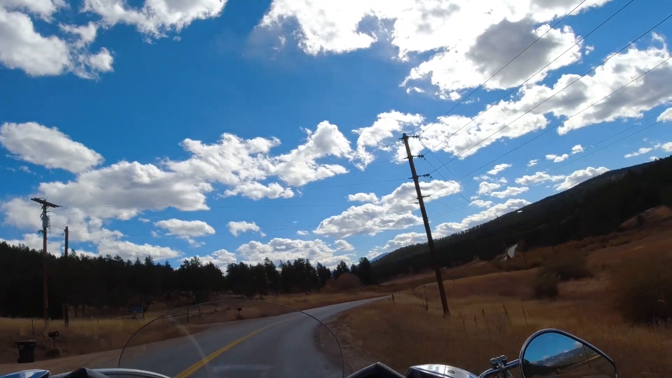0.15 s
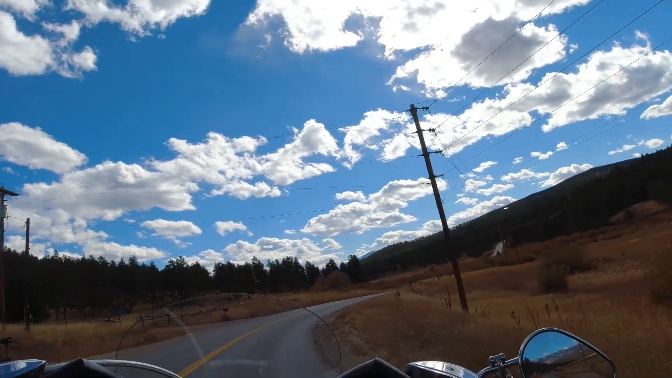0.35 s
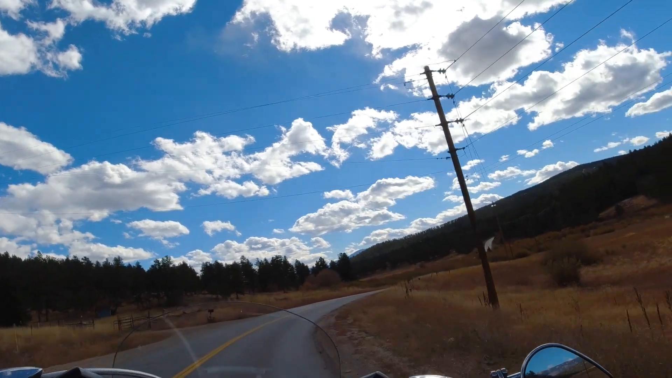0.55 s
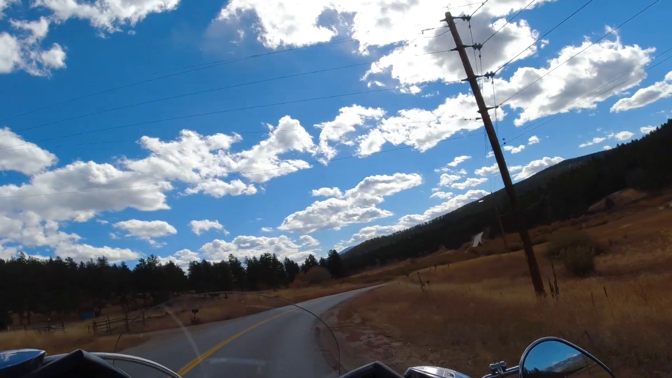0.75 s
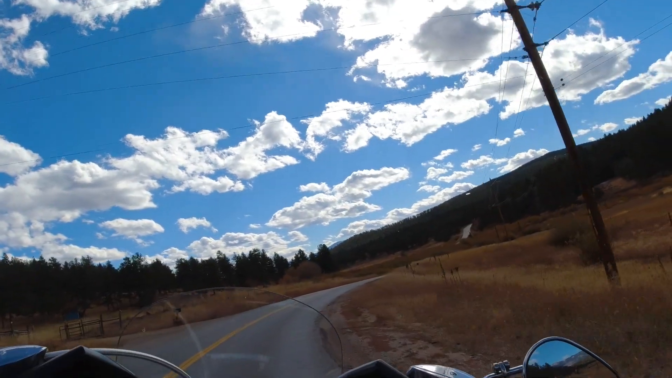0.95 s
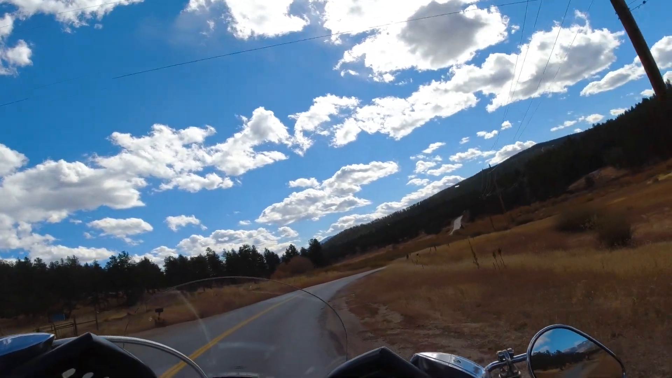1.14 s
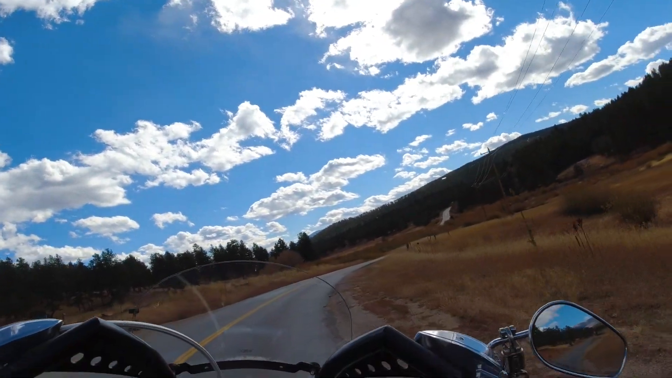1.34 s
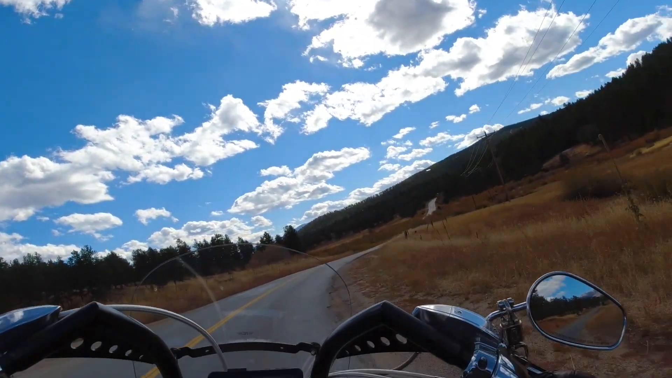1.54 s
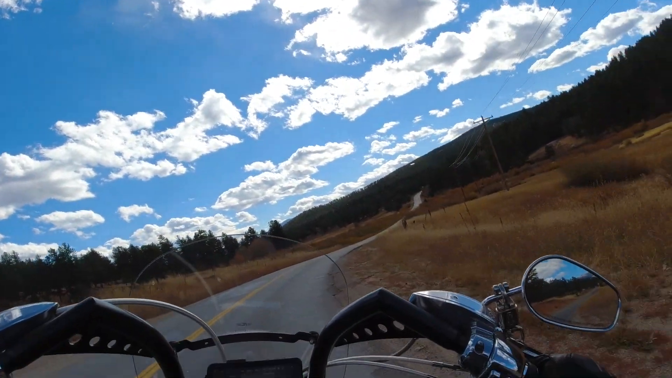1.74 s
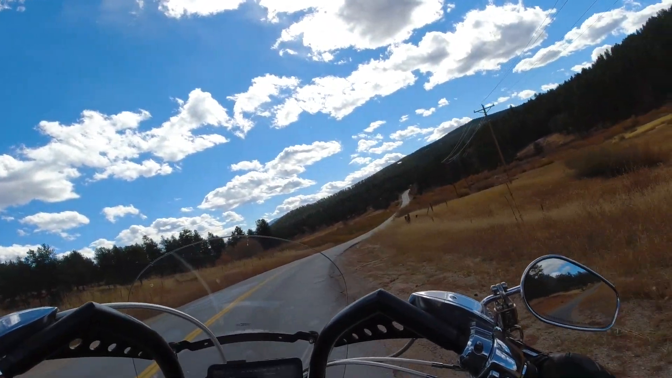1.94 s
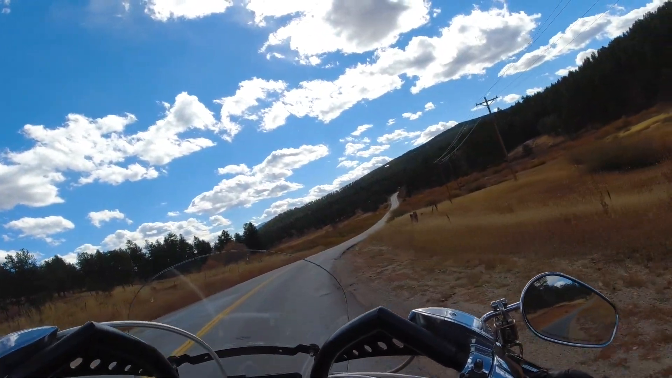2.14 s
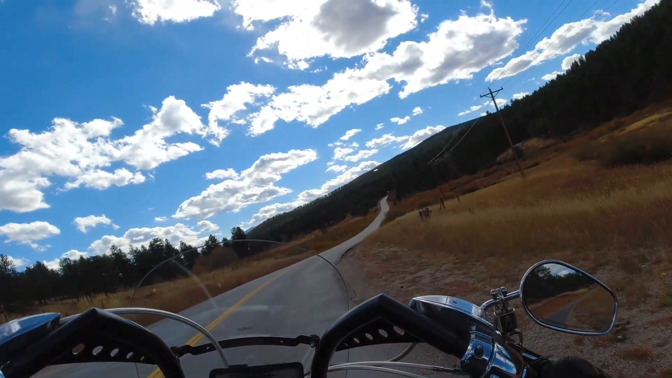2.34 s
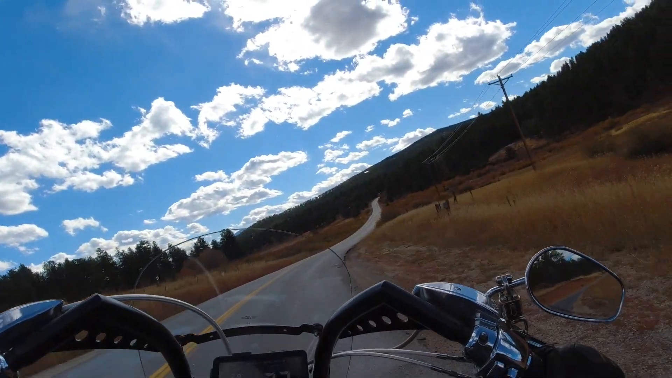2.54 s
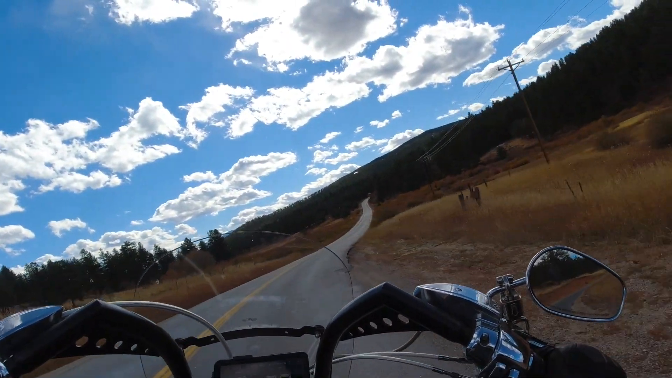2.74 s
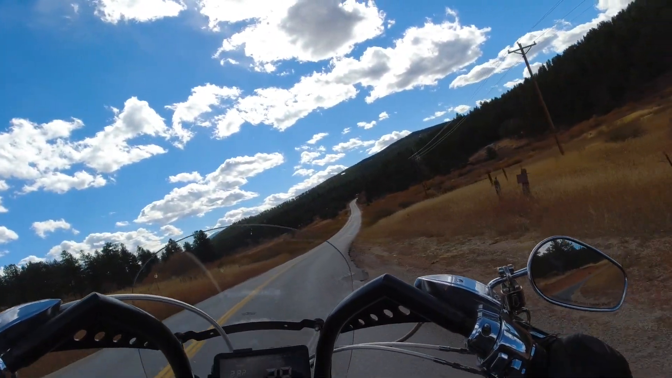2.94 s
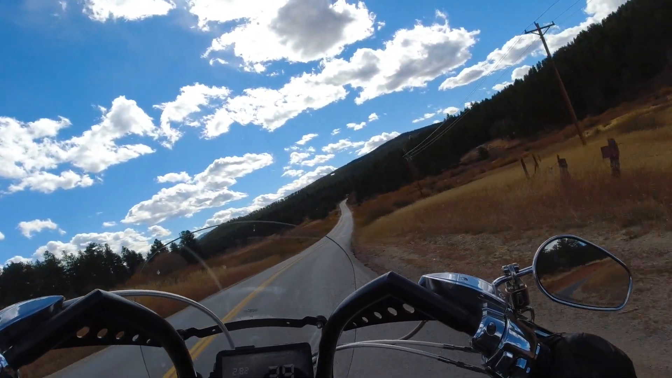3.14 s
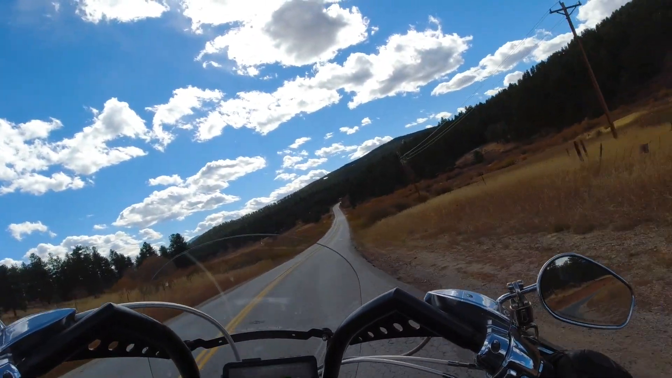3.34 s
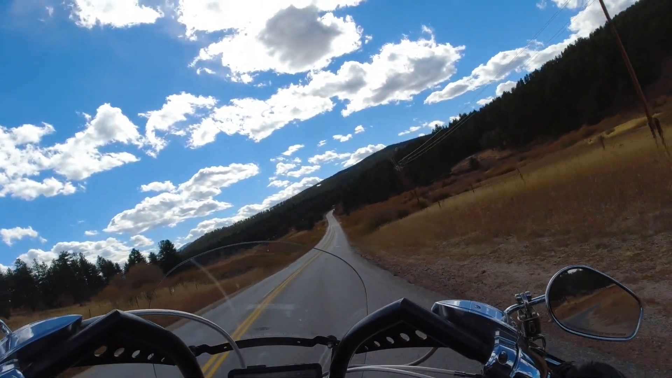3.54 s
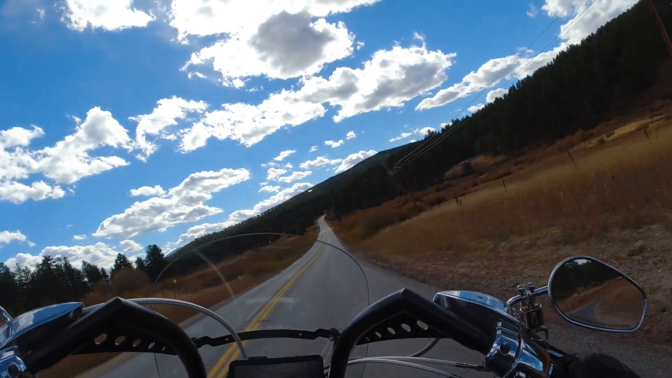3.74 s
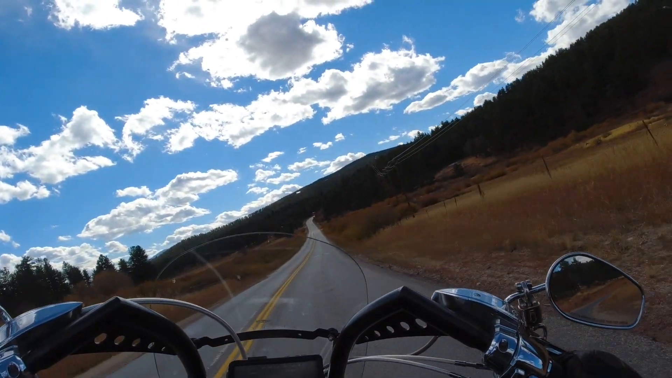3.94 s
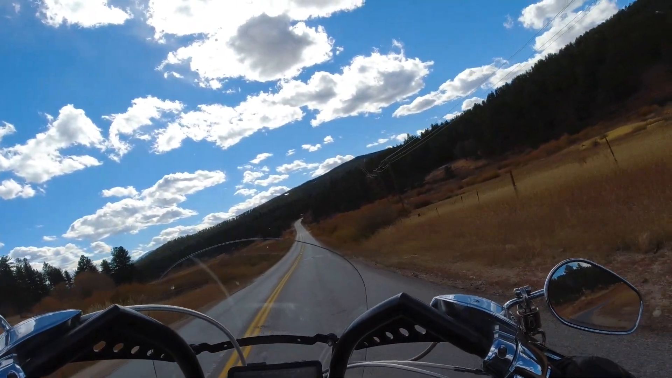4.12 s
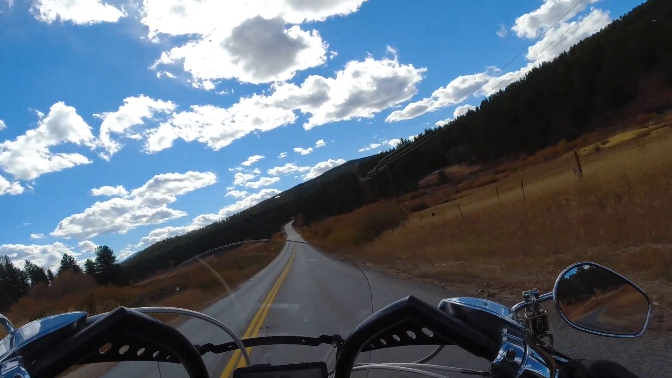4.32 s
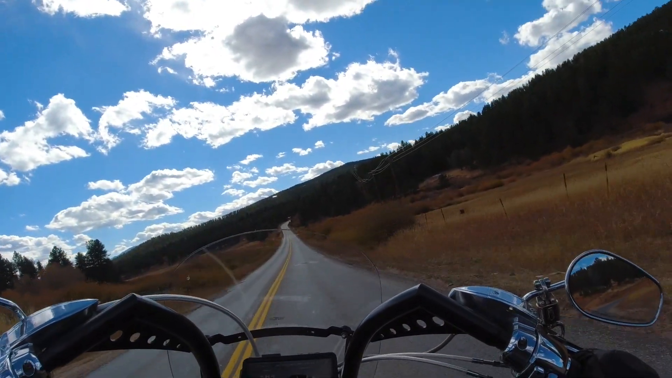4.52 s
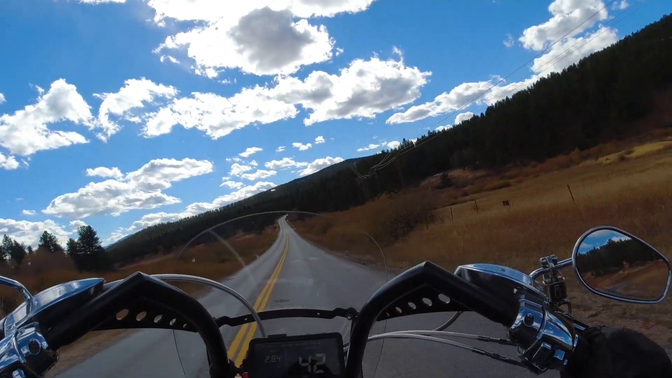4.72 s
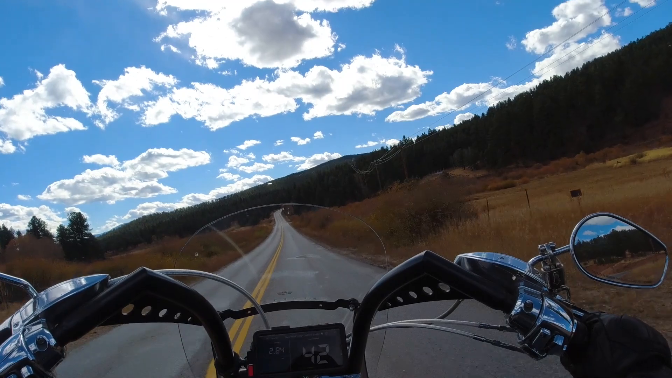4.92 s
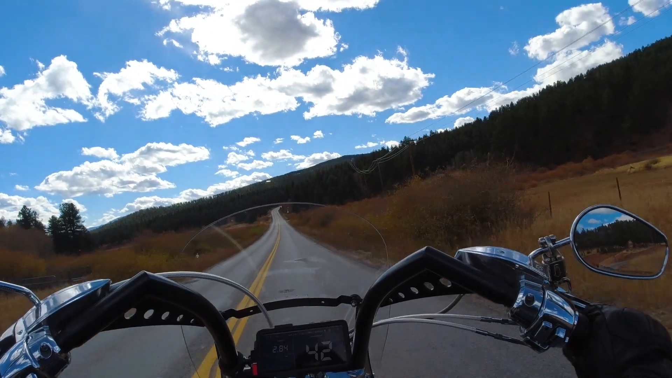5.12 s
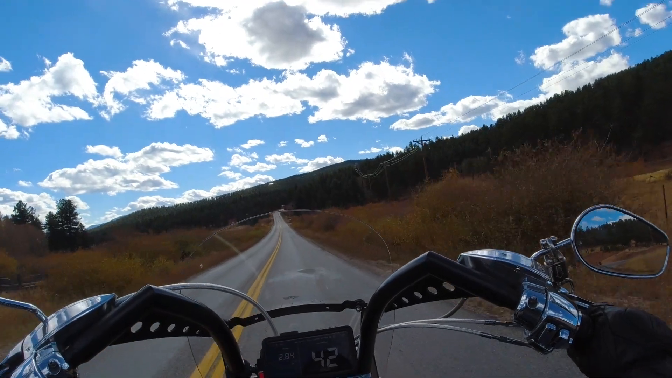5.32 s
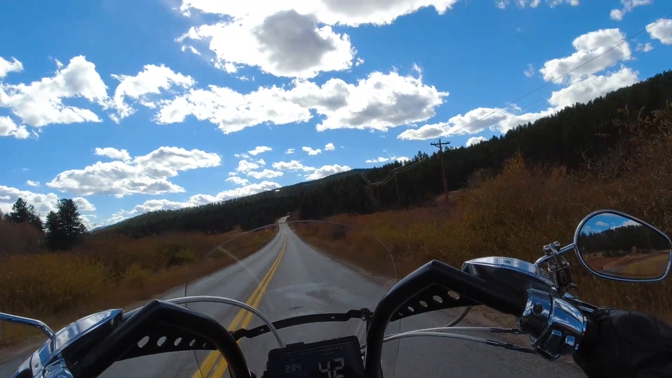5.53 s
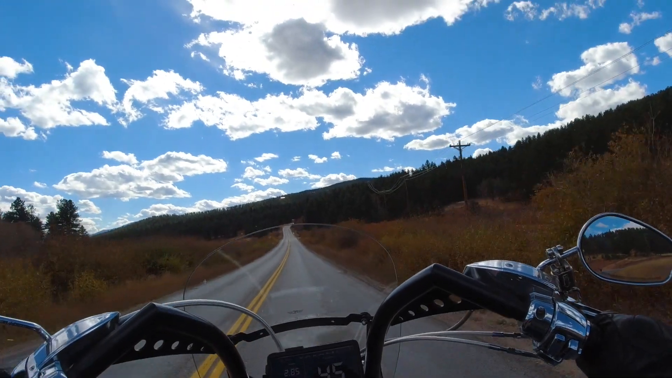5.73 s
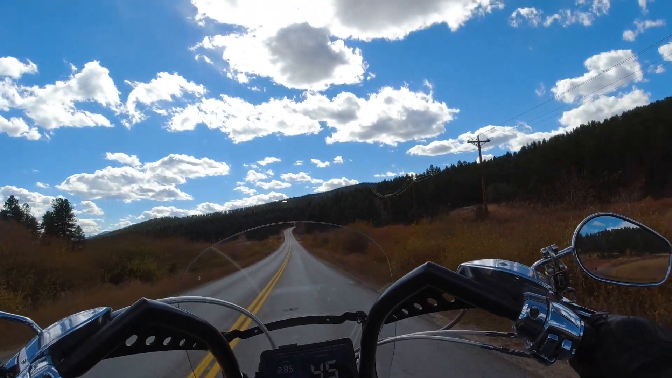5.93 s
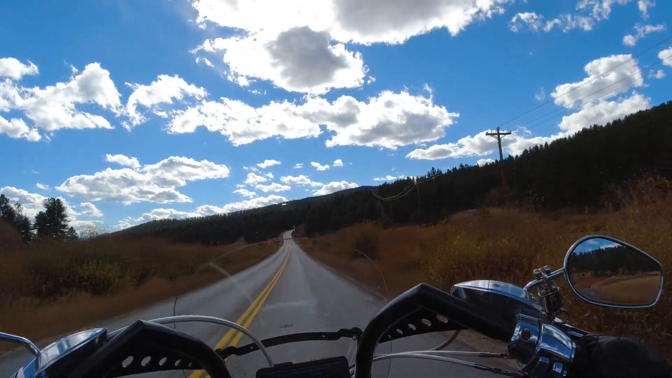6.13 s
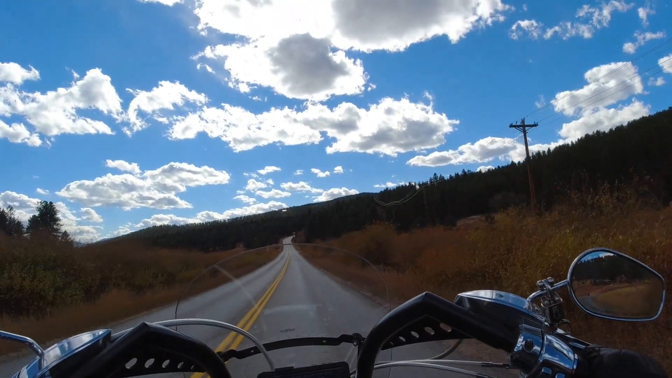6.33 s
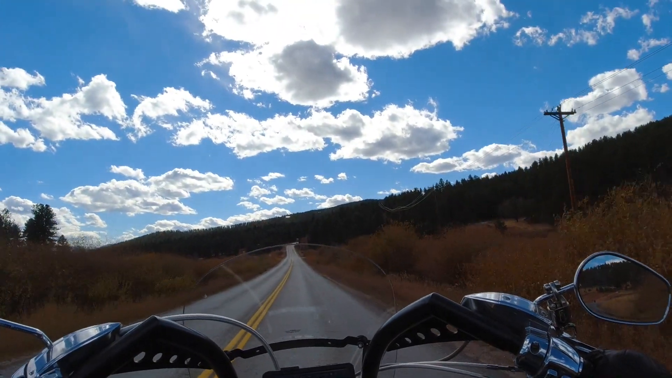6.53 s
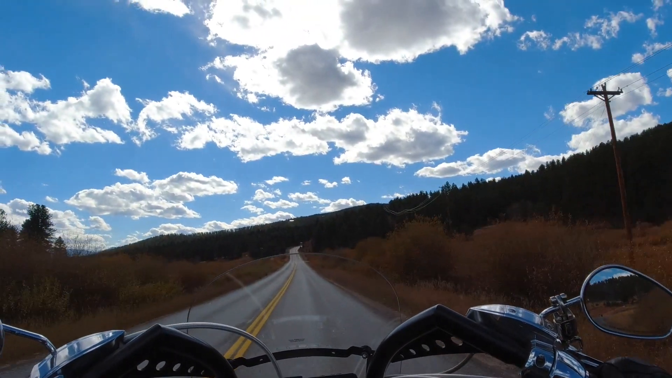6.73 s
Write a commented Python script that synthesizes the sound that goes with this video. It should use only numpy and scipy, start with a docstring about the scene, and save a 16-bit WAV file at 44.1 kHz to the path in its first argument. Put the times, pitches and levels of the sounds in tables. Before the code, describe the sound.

From the saddle, an uneven low twin-cylinder throb quickens, swells into a rasping full-throttle roar past a bump, and drops away at the end.

```python
"""A big V-twin runs at light load at first, heard from the saddle: pulse, clatter, soft hiss and wind together.
Unevenly spaced pairs of firings ring the exhaust pipes, rattle the metal and spit bursts of hiss.
The pace climbs, two panels boom in turn, the throttle opens wide, a bump thumps through the frame,
then the throttle shuts with a stray puff. Band-filtered noise with slow chance swells is the wind throughout."""
import sys
import numpy as np
from scipy import signal
from scipy.io import wavfile

SR = 44100
rng = np.random.default_rng(int(sys.argv[2]) if len(sys.argv) > 2 else 0)


def transcribe(signal):
    """Save signal, clipped to [-1, 1], as a 16-bit WAV file at the path in sys.argv[1]."""
    frames = np.atleast_2d(signal).T
    limited = np.clip(frames, -1, 1)
    pcm = np.round(limited * 32767).astype(np.int16)
    wavfile.write(sys.argv[1], SR, pcm)


N = 302967

# wind spectrum before overall levelling: [pitch_hz, density_db_per_hz]
WIND_COLOUR = [(11, -8), (18, -5), (28, -10), (44, -12.5), (62, -16), (85, -27), (130, -19.5), (250, -24),
               (340, -28), (500, -41.5), (1200, -63.5), (4000, -62), (9000, -79), (14000, -88)]
# thump through the frame, levels ahead of softening: [start_s, level_db, pitch_hz, t60_s, push +1 or pull -1]
BUMP_RINGS = [(5.272, -14, 15, .2, -1), (5.311, -8, 22, .08, 1), (5.335, -9, 75, .09, -1),
              (5.345, -16, 180, .09, -1), (5.48, -14, 145, .1, 1)]
# crank speed: [time_s, four_stroke_cycles_per_s]
CRANK_SPEED = [(0.0, 15.687), (0.22, 15.752), (0.44, 15.795), (0.66, 15.836), (0.88, 15.883), (1.1, 15.97),
               (1.32, 16.094), (1.54, 16.199), (1.76, 16.303), (1.98, 16.445), (2.2, 16.606),
               (2.42, 16.834), (2.64, 16.994), (2.86, 17.137), (3.08, 17.284), (3.3, 17.442),
               (3.52, 17.669), (3.74, 17.862), (3.96, 17.974), (4.18, 18.114), (4.4, 18.322),
               (4.62, 18.532), (4.84, 18.77), (5.06, 19.065), (5.28, 19.413), (5.5, 19.786), (5.72, 20.196),
               (5.94, 20.566), (6.16, 20.884), (6.38, 21.228), (6.72, 21.624), (6.87, 21.3)]
# engine load, heard as the level of the exhaust hiss: [time_s, level_db]
HISS_LEVEL = [(0, -50.5), (1.0, -49.5), (1.5, -48.5), (2.5, -46.5), (3.5, -46), (4.0, -44.5), (4.75, -44),
              (5.0, -40.5), (5.4, -37), (6.55, -37.5), (6.66, -39.5), (6.74, -44.5), (6.87, -43.5)]
# wide throttle: [opens_s, opening_time_s, shuts_s, shutting_time_s]
THROTTLE_MOVE = (4.84, 0.39, 6.66, 0.24)
# frame rocking once, twice and three times a cycle, before the wide-open lift: [level_db over the pulse]
ROCKING_DB = [-24.5, -11, -20]
# clean tones that glide with the crank: [multiple of the cycle rate]
TONE_ORDERS = np.array([10, 13, 14, 16, 20, 21, 23, 24, 26, 27, 28, 31, 33, 35])
# the resonance each tone crosses; at half_width it is down to a quarter of its height:
# [pitch_hz, half_width_hz, peak_db, wide_open_gain_db]
TONE_RESONANCES = [(202.4, 29, -44.5, 10.5), (226, 88, -46.5, -8.5), (295, 41, -43, 7),
                   (303, 34, -47.5, 1.5), (409, 29, -60, 16.5), (402, 40, -59.5, 10), (451, 37, -52.5, 7),
                   (490, 32, -58.5, 12.5), (483, 70, -52.5, 5), (455, 16, -55, 1), (491, 51, -49, -5),
                   (660, 44, -61, 6), (680, 67, -59, 13), (691, 37, -62, 13.5)]
# modes that ping at every firing for a while: [pitch_hz, t60_s, level_db over the hiss, centre_s, half_width_s]
PING_MODES = [(2694, 0.032, -12.5, 2.56, 2.2), (2533, 0.032, -7, 2.7, 1.4), (4720, .02, -17.5, 2.37, 0.7),
              (3680, 0.034, -20, 1.77, 0.72), (3960, .03, -8, 4.98, 0.11), (1860, 0.02, -7, 4.85, 0.27),
              (2080, 0.03, -11, 4.98, 0.081), (1620, .04, -1, 3.35, 0.092), (2780, .03, -11, 0.16, 0.24),
              (3450, 0.017, -12.5, .4, 0.39), (1160, 0.025, -6, 1.78, .15)]
# metal of heads and pipes, relative levels: [pitch_hz, level_db, t60_s, slope_db per dB of hiss]
METAL_MODES = [(1218, -1, 0.028, 0.5), (1420, -5, .02, 0.77), (1620, -1.5, 0.015, 1.46),
               (1860, -7.5, .015, 1.7), (2260, -0.5, 0.023, 0.37), (2520, -2.5, 0.015, 0.72),
               (2720, 0, 0.015, 0.56), (3260, -14, 0.017, -0.7), (3460, -10, 0.03, -0.24),
               (3680, -5.5, 0.022, -0.33), (3910, -11, 0.024, -.4), (4210, -10.5, 0.027, 0),
               (4800, -14, 0.012, -0.03)]
# firings with a set crack level, each favouring one metal mode: [time_s, extra_db, pitch_hz]
SET_CRACKS = [(.133, 5, 2720), (.196, 2, 2720), (.323, 2, 3460), (.386, -1.5, 3460), (.549, 2.5, 3680),
              (.576, -2, 2720), (.99, -3.5, 1218), (1.365, 2, 3460), (1.735, 6, 2260), (1.762, 4, 1218),
              (1.796, 2.5, 2720), (1.884, 5, 2520), (1.918, 2.5, 4800), (2.04, 3.5, 2720), (2.101, 3, 2720),
              (2.367, 0.5, 2520), (2.401, 7, 3680), (2.427, 2, 2520), (2.637, 8, 4800), (2.663, 7, 2720),
              (2.696, 4, 2520), (2.722, 3.5, 2520), (3.187, 4, 2520), (3.334, 4.5, 1620),
              (3.391, 1.5, 1620), (3.81, 4, 3680), (3.866, 2.5, 1218), (3.922, 2, 2720), (3.978, 2, 1218),
              (4.504, 3, 2260), (4.796, 2.5, 1860), (4.88, 4.5, 1860), (4.933, 3, 3680), (4.985, 3, 2260),
              (5.038, 3.5, 1218), (5.091, 1, 1218), (5.113, 5, 2720), (5.247, 1.5, 1420),
              (5.269, 2.5, 2720), (5.423, 1, 1420), (5.524, 2.5, 1860), (5.603, 2.5, 1860),
              (5.702, 2.5, 2260), (5.822, -0.5, 1620), (5.92, -0.5, 2260), (5.969, 2, 1860),
              (5.996, 2.5, 1218), (6.209, 2.5, 1218), (6.284, 4.5, 1420), (6.425, 2.5, 1860),
              (6.519, 3, 1218)]
# times when the clatter swells: [centre_s, half_width_s, gain_db]
CLATTER_SURGES = [(2.7, 2.7, 2.5), (5.05, 0.55, 4.5), (6.0, 1.1, 5)]
# exhaust hiss spectrum before the tilt and throttle changes: [pitch_hz, density_db_per_hz]
HISS_COLOUR = [(190, -36), (330, -7), (450, -3), (600, -4.5), (680, -9.5), (818, -19), (1210, -10.5),
               (1400, -12), (2690, -18.5), (3040, -24.5), (4940, -25.5), (7000, -38.5), (9240, -44),
               (12000, -57), (13900, -69)]
# steady rush between the bursts, before the wide-open lift: [pitch_hz, level_db over the bursts]
RUSH_COLOUR = [(300, 7), (650, 3), (1000, 2), (3000, 2), (6000, -4), (12000, -0.5)]
# pipe modes; the sign is push or pull at the ear: [pitch_hz, t60_s, front_strength, rear_strength]
PIPE_MODES = [(76.5, 0.18, -0.5, -1.34), (112.4, 0.065, 2, -1.5), (132.3, 0.069, 0.1, 3.5),
              (159.3, 0.093, 0.82, -2.04), (184.4, 0.056, 4, 3), (204, 0.027, -1.37, 1.58),
              (234.7, 0.047, -0.15, 1.49), (260.4, 0.037, -2.5, -2.5), (296.6, 0.03, 0.54, 1.34)]
# upper pipe modes, which speak up with the hiss: [pitch_hz, t60_s, front_strength, rear_strength]
GROWL_MODES = [(347, 0.067, 0.15, 0.54), (391, .08, 0.091, 0.059), (424.5, .12, -1.2, 0.57),
               (478.4, 0.098, 1.08, 0.25), (511, .08, -0.37, -0.47), (547, 0.095, -0.93, -0.33),
               (583.4, 0.13, 0.3, -0.36), (673, 0.067, -0.95, 1.35)]
# two bodywork resonances that the pulses drive, each for a while: [pitch_hz, t60_s, rest_coupling_db,
# start_s, start_time_s, stop_s, stop_time_s, start_coupling_db, change_db_per_s]
PANEL_MODES = [(108.14, 0.53, -36.5, 5.2, 0.099, 6.72, 0.24, 14, -8.5),
               (128, 0.33, -36, 3.94, 0.088, 5.0, 0.065, -16.5, 14.5)]

# wind: builds evenly as road speed grows; one strong gust falls back to a small remainder
WIND_START_DB, WIND_RISE_DB_PER_S = -37.5, 1.02
GUST_S, GUST_RISE_S, GUST_DB, GUST_FALL_S, GUST_LEFT_DB = 5.15, 0.2, 8.5, 0.48, 1

# timing of the firings
FIRST_CYCLE = -.646   # crank position at the start, in cycles before the front cylinder fires
REAR_AFTER = (360 - 45) / 720   # a 45 degree vee fires the rear cylinder 315 degrees after the front
JITTER_S = .00006
SHUT_S, SHUT_DB = 6.72, -15.5   # with the throttle shut the firings hardly crack

# shake and tones
WIDE_OPEN_SHAKE_DB = 8
TONE_WAVER_DB, WIDE_OPEN_FLUTTER_DB = 1.2, 1.8   # at wide throttle the upper tones break up

# pings and clatter
PING_SPREAD_DB = 4.5
CLATTER_OVER_HISS_DB, WIDE_OPEN_CLATTER_DB = -7, -1.5   # at wide throttle the knocks sink into the roar
STRIKES, STRIKE_S, STRIKE_SPREAD_DB = 4, .009, 9   # knocks per firing and the time they scatter over
# the first knock comes within a shorter time of the firing and tends to be the hardest
FIRST_STRIKE_LATE_S, FIRST_STRIKE_DB, FIRST_STRIKE_SPREAD_DB = 0.00247, 4.5, 4
BLUNT_T60_S = 0.0045   # a second, brief resonance rounds each knock's onset
CRACK_MODE_DB = 8   # lift of a favoured mode over its usual share

# hiss bursts: low, middle and treble bands have their own rise and colour
BURST_LATE_S = .003   # each band of the jet starts up to this much after the firing
LOW_RISE_S, BURST_RISE_S, TREBLE_RISE_S = .0025, 0.0011, 0.0022
BURST_FALL_S, UPPER_FALL_S = 0.0067, 0.0065   # above 2 kHz the bursts die sooner
LOW_COLOUR_DB, BURST_COLOUR_DB, TREBLE_COLOUR_DB = 2, 6.5, 4.5   # chance spread from burst to burst
BURST_SPREAD_DB = 1.57
JET_CRACK_SHARE = .75   # the jet follows the loud cracks only in part
LOW_HISS_DB, WIDE_OPEN_LOW_HISS_DB = -2, -6   # the muffler holds back the hiss under 600 Hz
WIDE_OPEN_MID_HISS_DB = 2.5   # the hollow near 900 Hz fills in
WIDE_OPEN_RUSH_DB = 2   # the gas rasps on between the bursts
# tilt above 4 kHz in dB per octave: steady, a step as the throttle opens, then a climb per second
BRIGHT_DB, BRIGHT_STEP_S, BRIGHT_STEP_DB, BRIGHT_CLIMB_DB_PER_S = -4.5, 4.87, 2.5, 1.8
POP_S, POP_DB = 6.783, -4   # a stray puff from the pipe after the throttle shuts

# exhaust pulses
PULSE_LEAD_S, PULSE_SOFT_HZ = 0.002484, 503
PULSE_SPREAD_DB, RING_SPREAD = .4, .06
PULSE_OVER_HISS_DB, WIDE_OPEN_PULSE_DB = 14.5, -4.5   # the pulses grow less than the hiss at wide throttle
PULSE_FADE_S, PULSE_FADE_DB_PER_S = 6.69, 248   # the burns die away
GROWL_OVER_HISS_DB, WIDE_OPEN_GROWL_DB = 5.5, 2.5
BOOM_WAVER_DB = .7
DAMP_S, DAMP_DB_PER_S = 6.74, 52   # the panels fall quiet once the burns stop

MIC_LOW_HZ, CUTOFF_HZ, FADE_S = 4, 14050, .003


def from_db(db):
    """Gain of a level in dB."""
    return 10 ** (np.asarray(db) / 20)


def rms_one(x):
    """Scale to rms 1."""
    return x / np.sqrt(np.mean(x ** 2) + 1e-20)


def in_time(rows):
    """Columns of a curve table, sample by sample."""
    time_s, *columns = np.transpose(rows)
    return [np.interp(np.arange(N) / SR, time_s, column) for column in columns]


def at_times(curve, times):
    """A sample-by-sample curve read at given times."""
    return np.interp(times * SR, np.arange(N), curve)


def at_hz(points, hz):
    """A spectrum read on a log-frequency axis."""
    return np.interp(np.log(hz), np.log(np.array(points)[:, 0]), np.array(points)[:, 1])


def ramp(start, seconds):
    """0 before the start, rising evenly to 1."""
    return np.clip((np.arange(N) / SR - start) / seconds, 0, 1)


def since(start):
    """Seconds elapsed after a moment."""
    return np.maximum(np.arange(N) / SR - start, 0)


def swell(centre, half):
    """A triangle in time, 0-1."""
    return np.clip(1 - abs(np.arange(N) / SR - centre) / half, 0, 1)


def clicks(times, sizes):
    """One click of the given size at each time."""
    return np.bincount((np.asarray(times) * SR).astype(int), sizes, N)[:N] + 1e-18


def ring(x, hz, t60):
    """Two-pole resonance: a unit click sets a sine of about height 1 ringing."""
    r = from_db(-60 / (t60 * SR))
    w = 2 * np.pi * hz / SR
    return signal.lfilter([0, np.sin(w)], [1, -2 * r * np.cos(w), r * r], x)


def lag(x, seconds):
    """One-pole low-pass with the given time constant."""
    r = np.exp(-1 / (seconds * SR))
    return signal.lfilter([1 - r], [1, -r], x)


def drift(rate_hz):
    """Slow chance of rms 1: white noise smoothed twice."""
    tau = 1 / (2 * np.pi * rate_hz)
    return rms_one(lag(lag(rng.standard_normal(N + SR), tau), tau)[SR:])


def noise_bands(spectrum, low_hz, high_hz, count):
    """Yields centre and band-passed noise, band by band, at the level of the spectrum."""
    edges = np.geomspace(low_hz, high_hz, count + 1)
    white = rng.standard_normal((2, N))   # neighbouring bands take turns on two noises
    for k, (low, high) in enumerate(zip(edges, edges[1:])):
        band_pass = signal.butter(2, [low, high], "band", fs=SR, output="sos")
        centre = np.sqrt(low * high)
        yield centre, from_db(at_hz(spectrum, centre)) * signal.sosfilt(band_pass, white[k % 2])


def wind():
    """Lumpy turbulence at the microphone port, strongest in the deepest bass."""
    gust = drift(1.5)
    level_db = WIND_START_DB + WIND_RISE_DB_PER_S * since(0)
    level_db = level_db + GUST_DB * ramp(GUST_S, GUST_RISE_S)
    level_db = level_db - (GUST_DB - GUST_LEFT_DB) * ramp(GUST_S + GUST_RISE_S, GUST_FALL_S)
    bands = noise_bands(WIND_COLOUR, 12.06, 14620, count=24)
    # every band shares the slow gusting and flutters on its own
    turbulence = sum(band * from_db(.7 * gust + drift(6)) for _, band in bands)
    return from_db(level_db) * rms_one(turbulence)


def bump():
    """The frame dips, rebounds and knocks: a few struck resonances, all softened."""
    swing = sum(ring(clicks([start], [way * from_db(db)]), hz, t60) for start, db, hz, t60, way in BUMP_RINGS)
    return lag(swing, .002)


def throttle():
    """How far the throttle stands wide open, 0-1."""
    opens, rise, shuts, fall = THROTTLE_MOVE
    return ramp(opens, rise) - ramp(shuts, fall)


def crank():
    """Crank position in four-stroke cycles, summed from the speed."""
    return FIRST_CYCLE + np.cumsum(in_time(CRANK_SPEED)[0]) / SR


def firings():
    """Times at which the crank passes each firing angle; front and rear alternate."""
    cycles = crank()
    angles = (np.arange(-1, int(cycles[-1]))[:, None] + [0, REAR_AFTER]).ravel()
    times = np.interp(angles, cycles, np.arange(N) / SR)
    times = times + JITTER_S * rng.standard_normal(len(times))
    return np.maximum(times, PULSE_LEAD_S), angles > FIRST_CYCLE


def sharpness(times):
    """How hard each firing cracks, in dB, by chance except for the set ones, and the mode it favours."""
    crack_db = BURST_SPREAD_DB * rng.standard_normal(len(times))
    favoured = np.full(len(times), -1)   # -1: no favourite
    for time_s, extra_db, hz in SET_CRACKS:
        nearest = np.argmin(abs(times - time_s))
        crack_db[nearest] = extra_db
        favoured[nearest] = np.argmin(abs(np.array(METAL_MODES)[:, 0] - hz))
    return crack_db + SHUT_DB * (times > SHUT_S), favoured


def shake(pulse_db):
    """The engine rocks the frame: low sines on the first multiples of the cycle rate."""
    waves = sum(from_db(db) * np.sin(2 * np.pi * (k + 1) * crank()) for k, db in enumerate(ROCKING_DB))
    return from_db(pulse_db + WIDE_OPEN_SHAKE_DB * throttle()) * waves


def tones():
    """Wavering sines locked to the crank, loudest on their resonances; they stop when the throttle shuts."""
    speed = in_time(CRANK_SPEED)[0]
    out = 0
    for order, (hz, width, peak_db, open_db) in zip(TONE_ORDERS, TONE_RESONANCES):
        level_db = peak_db + open_db * throttle() + TONE_WAVER_DB * drift(3.6)
        level_db = level_db + WIDE_OPEN_FLUTTER_DB * (order > 16) * throttle() * drift(12.0)
        resonance = 1 / (1 + ((order * speed - hz) / width) ** 2) ** 2
        out = out + from_db(level_db) * resonance * np.sin(2 * np.pi * order * crank())
    return out * (1 - ramp(*THROTTLE_MOVE[2:]))


def ping(times, sizes):
    """Soft rings at each firing: doubled resonances, each mode swelling in and out."""
    out = 0
    for hz, t60, db, centre, half in PING_MODES:
        own = sizes * from_db(PING_SPREAD_DB * rng.standard_normal(len(times)))
        rung = ring(ring(clicks(times, own), hz, t60), hz, t60 / 4)
        out = out + from_db(db) * swell(centre, half) * rms_one(rung)
    return out


def clatter(times, sizes, favoured, hiss_db):
    """A few uneven, blunt knocks follow each firing; every mode is struck at its own moments and strengths."""
    shape = (len(times), STRIKES)
    load_db = at_times(hiss_db - np.mean(hiss_db), times)
    first = np.arange(STRIKES) == 0
    late_s = np.where(first, FIRST_STRIKE_LATE_S, STRIKE_S)
    spread = np.where(first, FIRST_STRIKE_SPREAD_DB, STRIKE_SPREAD_DB)
    out = 0
    for k, (hz, level_db, t60, slope) in enumerate(METAL_MODES):
        knocks = (times[:, None] + late_s * rng.random(shape)).ravel()
        knock_db = spread * np.clip(rng.standard_normal(shape), -2, 1.8) + FIRST_STRIKE_DB * first
        mode_db = level_db + slope * load_db + CRACK_MODE_DB * (favoured == k)
        own = (sizes * from_db(mode_db))[:, None] * from_db(knock_db)
        signs = rng.choice([-1, 1], shape)
        struck = ring(clicks(knocks, (own * signs).ravel()), hz, t60)
        out = out + ring(struck, hz, BLUNT_T60_S)
    return rms_one(out)


def brightness():
    """Treble tilt of the jet in dB per octave."""
    opened = ramp(BRIGHT_STEP_S, .012) - ramp(*THROTTLE_MOVE[2:])
    return BRIGHT_DB + opened * (BRIGHT_STEP_DB + BRIGHT_CLIMB_DB_PER_S * since(BRIGHT_STEP_S))


def hiss(times, sizes):
    """Gas jets out in a burst of noise at each firing, with a colour of its own, over a steady rush."""
    bright_db = brightness()
    low_db = LOW_HISS_DB + WIDE_OPEN_LOW_HISS_DB * throttle()
    mid_db = WIDE_OPEN_MID_HISS_DB * throttle()
    rush_db = WIDE_OPEN_RUSH_DB * throttle()
    out = 0
    for hz, band in noise_bands(HISS_COLOUR, 340.7, 14680, count=34):
        rise = TREBLE_RISE_S if hz > 6000 else LOW_RISE_S if hz < 1500 else BURST_RISE_S
        fall = UPPER_FALL_S if hz > 2000 else BURST_FALL_S
        colour_db = TREBLE_COLOUR_DB if hz > 6000 else LOW_COLOUR_DB if hz < 800 else BURST_COLOUR_DB
        chance_db = colour_db * np.clip(rng.standard_normal(len(times)), -2, 1.6)
        own = sizes ** JET_CRACK_SHARE * from_db(chance_db)
        starts = times + BURST_LATE_S * rng.random(len(times))
        bursts = rms_one(lag(lag(clicks(starts, own), fall), rise))
        tilt_db = bright_db * np.clip(np.log2(hz / 4000), 0, 1.2)
        band = band * from_db(tilt_db + low_db * (hz < 600) + mid_db * (700 < hz < 1150))
        out = out + band * rms_one(bursts + from_db(at_hz(RUSH_COLOUR, hz) + rush_db))
    return rms_one(out)


def pipes(modes, times, sizes):
    """Each cylinder rings the modes its own way, and no two burns quite alike."""
    vary = 1 + RING_SPREAD * rng.standard_normal((len(times), len(modes)))
    out = 0
    for (hz, t60, front, rear), own in zip(modes, vary.T):
        strengths = np.resize([front, rear], len(times))   # front and rear alternate
        out = out + ring(clicks(times, sizes * own * strengths), hz, t60)
    return out


def panels(times, sizes):
    """Bodywork resonances driven by the pulses; their coupling shifts for a while and their boom wavers."""
    out = 0
    for hz, t60, rest_db, starts, rise, stops, fall, start_db, slope in PANEL_MODES:
        share = ramp(starts, rise) - ramp(stops, fall)
        coupling_db = rest_db + share * (start_db + slope * since(starts) - rest_db)
        boom = ring(clicks(times, sizes) * from_db(coupling_db), hz, t60)
        out = out + boom * from_db(BOOM_WAVER_DB * drift(9.0) - DAMP_DB_PER_S * since(DAMP_S))
    return out


def exhaust(times, fired, pulse_db, growl_db):
    """Each firing is a soft pressure pulse that rings the pipes and the panels."""
    burn = fired * from_db(PULSE_SPREAD_DB * rng.standard_normal(len(times)))
    pulses = burn * from_db(at_times(pulse_db, times))
    early = times - PULSE_LEAD_S
    growl = burn * from_db(at_times(growl_db, early))
    out = pipes(PIPE_MODES, early, pulses) + pipes(GROWL_MODES, early, growl) + panels(early, pulses)
    tau = 1 / (2 * np.pi * PULSE_SOFT_HZ)
    muffler = signal.butter(2, 1500, fs=SR)   # the muffler takes the edge off
    return signal.lfilter(*muffler, lag(lag(out, tau), tau))


def scene():
    """Wind, bump and engine at one microphone."""
    hiss_db = in_time(HISS_LEVEL)[0]
    burn_fade_db = PULSE_FADE_DB_PER_S * since(PULSE_FADE_S)
    # the pulses hold the highest load reached so far, until the burns die away
    pulse_db = np.maximum.accumulate(hiss_db) + PULSE_OVER_HISS_DB
    pulse_db = pulse_db + WIDE_OPEN_PULSE_DB * ramp(*THROTTLE_MOVE[:2]) - burn_fade_db
    growl_db = hiss_db + GROWL_OVER_HISS_DB + WIDE_OPEN_GROWL_DB * throttle() - burn_fade_db
    clatter_db = hiss_db + CLATTER_OVER_HISS_DB + WIDE_OPEN_CLATTER_DB * throttle()
    clatter_db = clatter_db + sum(db * swell(centre, half) for centre, half, db in CLATTER_SURGES)

    times, fired = firings()
    crack_db, favoured = sharpness(times)
    cracks = fired * from_db(crack_db)
    jet = hiss(np.append(times, POP_S), np.append(cracks, from_db(POP_DB)))
    gas = from_db(hiss_db) * (jet + ping(times, cracks))
    metal = from_db(clatter_db) * clatter(times, cracks, favoured, hiss_db)
    engine = shake(pulse_db) + tones() + metal + gas + exhaust(times, fired, pulse_db, growl_db)
    return (wind() + bump() + engine)[None]


def record(dry):
    """The microphone passes no steady pressure, the top is cut; the last milliseconds fade."""
    dry = signal.lfilter(*signal.butter(1, MIC_LOW_HZ, "high", fs=SR), dry)
    top_cut = signal.cheby2(12, 70, CUTOFF_HZ, fs=SR, output="sos")
    return signal.sosfilt(top_cut, dry) * (1 - ramp(N / SR - FADE_S, FADE_S))


dry = scene()
out = record(dry)
transcribe(out)
```